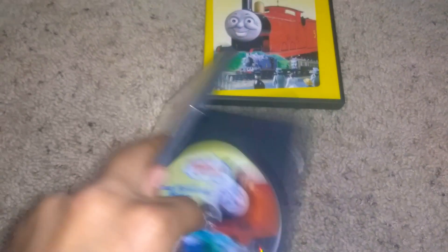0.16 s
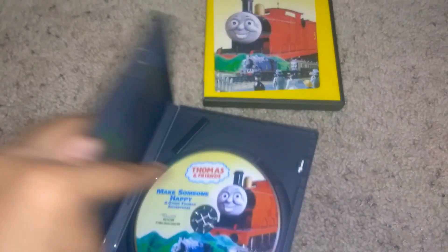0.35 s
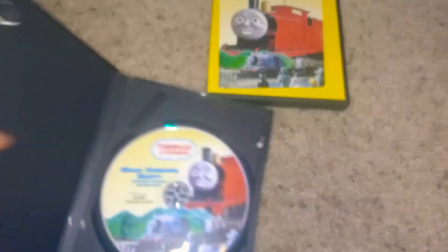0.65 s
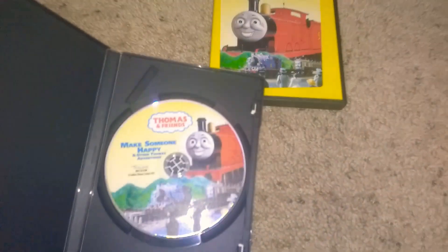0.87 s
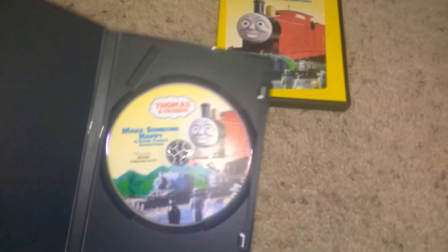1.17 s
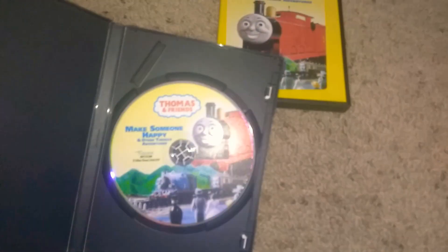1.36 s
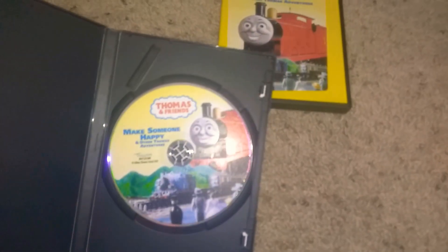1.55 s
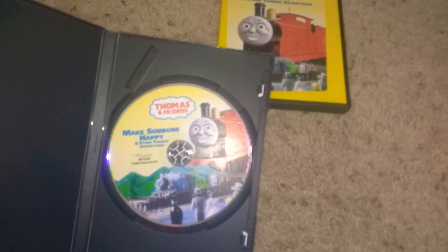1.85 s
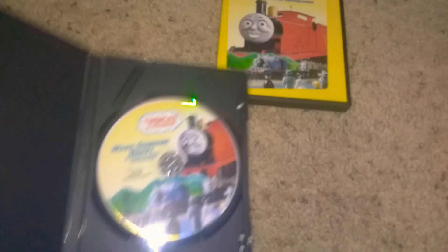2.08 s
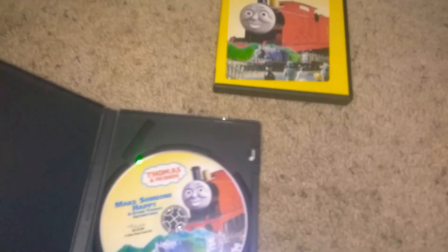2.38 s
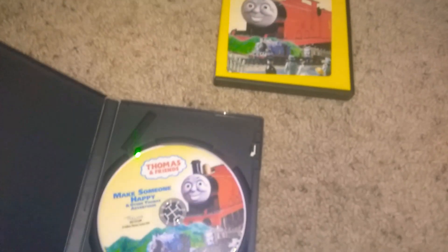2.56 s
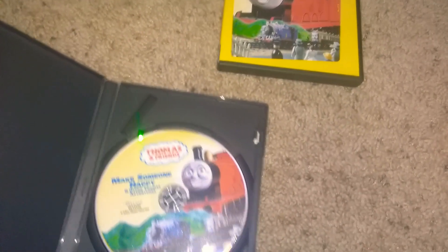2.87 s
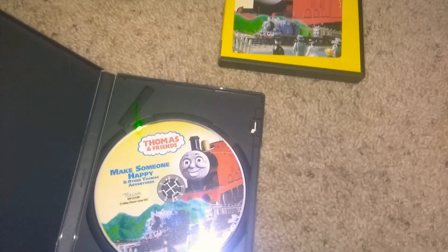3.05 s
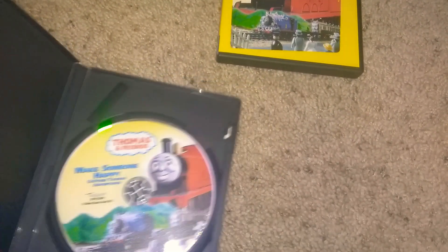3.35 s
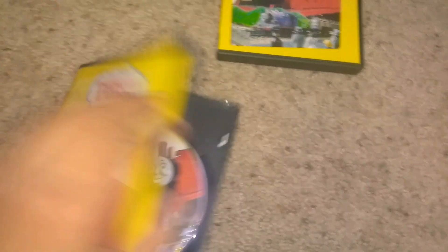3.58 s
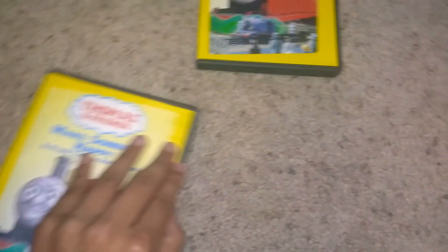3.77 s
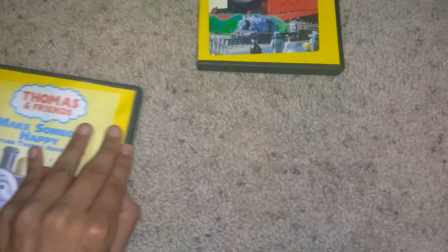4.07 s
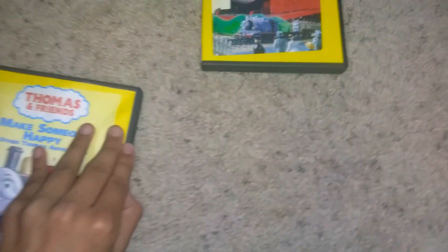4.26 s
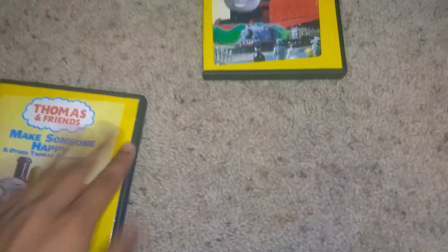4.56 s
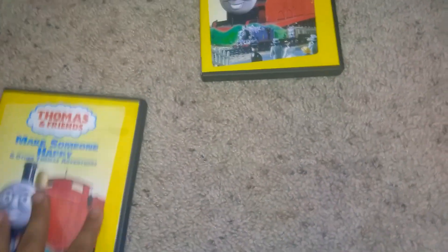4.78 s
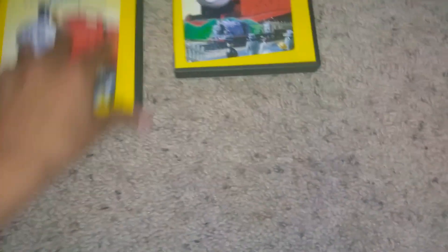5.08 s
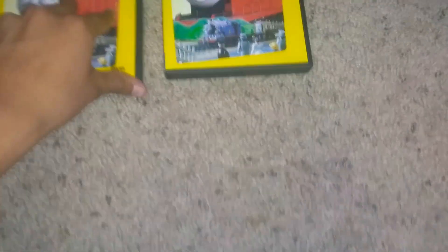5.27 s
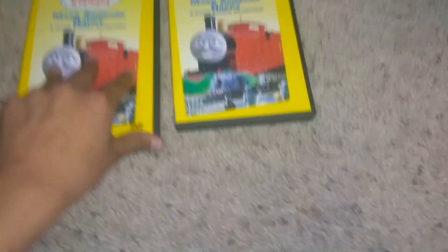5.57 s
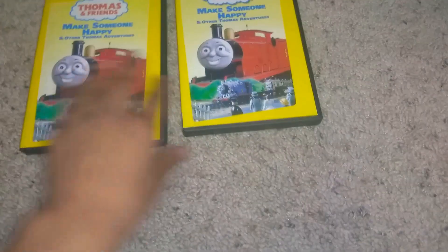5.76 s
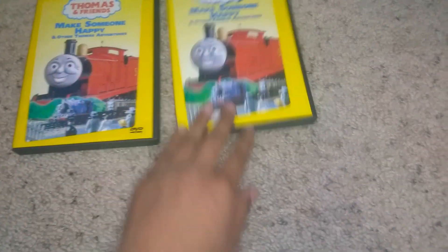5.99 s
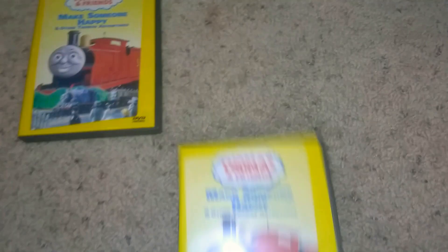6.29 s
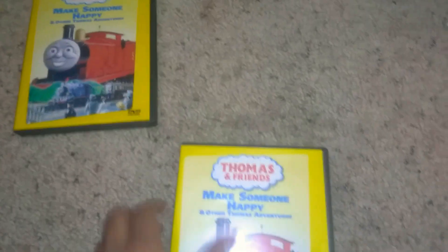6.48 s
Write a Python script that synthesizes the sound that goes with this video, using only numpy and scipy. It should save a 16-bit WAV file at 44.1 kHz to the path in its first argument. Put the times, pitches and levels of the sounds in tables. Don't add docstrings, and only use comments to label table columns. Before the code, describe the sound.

Very close on carpet, a hollow plastic case unlatches with a bright snap and short rattle. After a quiet hissy pause it snaps again more softly, with creaking walls, a thin hinge squeak and bumpy handling rumble. Two strong closing snaps come around four seconds, then light ticks, sleeve film rustle, finger knocks and sliding over the pile. Dry small room, phone microphone, slightly uneven level.

```python
import sys
import numpy as np
from scipy import signal
from scipy.fft import rfft, irfft
from scipy.io import wavfile
from scipy.ndimage import uniform_filter1d

SR = 44100
rng = np.random.default_rng(int(sys.argv[2]) if len(sys.argv) > 2 else 0)


def linear_from_db(decibels):
    return 10 ** (np.asarray(decibels, float) / 20)


def unload_audio(sound):
    columns = np.transpose(np.atleast_2d(sound))
    steps = np.round(np.clip(columns, -1, 1) * 32767)
    wavfile.write(sys.argv[1], SR, steps.astype(np.int16))


N = 292383
T = np.arange(N) / SR


def table(rows, at, log=False):
    x, *columns = np.transpose(rows)
    if log:
        x, at = np.log(x), np.log(at + 1e-9)
    return [np.interp(at, x, c) for c in columns]


def ring(x, hz, width_hz):
    return signal.lfilter(*signal.iirpeak(hz, hz / width_hz, fs=SR), x)


def dull(x, hz):
    keep = np.exp(-2 * np.pi * hz / SR)
    return signal.lfilter([1 - keep], [1, -keep], x)


def unit(x):
    return x / np.abs(x).max()


def colour(x, points):
    gain_db = table(points, np.fft.rfftfreq(N, 1 / SR), log=True)[0]
    return irfft(rfft(x) * linear_from_db(gain_db), N)


def noise(points, grain_db=0.0):
    grain = linear_from_db(grain_db * rng.exponential(size=N))
    x = colour(rng.standard_normal(N) * grain, points)
    return x / x.std()


def flicker(rate_hz, depth_db):
    k = int(SR / rate_hz)
    held = np.repeat(rng.standard_normal(N // k + 1), k)[:N]
    return linear_from_db(depth_db * uniform_filter1d(uniform_filter1d(held, k), k))


def steady(x, span_s):
    return x / np.sqrt(uniform_filter1d(x ** 2, int(span_s * SR)) + 1e-3)


def late(x, samples):
    return irfft(rfft(x) * np.exp(-2j * np.pi * np.fft.rfftfreq(N) * samples), N)


def clicks(events, slips_per_s, lead_db, rise, crack_share, shell_width_hz, thud_db, spray_db,
           preload=0.0, scatter_db=4):
    # f/Hz, width/Hz, level/dB
    shell_modes = [(205, 13, -36.5), (430, 45, -25), (1150, 130, -16.5), (1755, 370, -12.5),
                   (2950, 32, -21), (3470, 100, -60)]
    size, wait = 16384, 32
    out = np.zeros(N + size)
    t = np.arange(size) / SR
    for s, crack_db, shell_db, shell_hz, crack_hz, t60_s in events:
        t60_s = np.clip(t60_s, 0.004, 0.5)
        when, sign, big = rng.random(size), rng.standard_normal(size), rng.exponential(size=size)
        slips = (when < slips_per_s / SR) * np.sign(sign) * linear_from_db(np.minimum(scatter_db * big, 11))
        slips *= linear_from_db(-60 * t / t60_s) * np.minimum(t / (rise * t60_s), 1)
        slips = np.roll(slips, wait)
        spray = linear_from_db(spray_db) * ring(slips, 6000, 6900)
        slips[wait] = linear_from_db(lead_db)
        width_hz = crack_share * crack_hz
        crack = ring(ring(slips, crack_hz, width_hz), crack_hz, width_hz) + spray
        push = dull(slips, 3500)
        thud = linear_from_db(thud_db) * ring(push, 250, 300)
        push[:wait] -= preload * linear_from_db(lead_db) * np.hanning(wait) / wait
        shell = ring(push, shell_hz, shell_width_hz) + thud
        detune = 1 + 0.01 * rng.standard_normal(len(shell_modes))
        for (hz, mode_width_hz, db), d in zip(shell_modes, detune):
            shell += linear_from_db(db) * ring(push, hz * d, mode_width_hz)
        crack = unit(dull(dull(crack, 8800), 8800))
        i = int(s * SR) - wait
        out[i:i + size] += linear_from_db(crack_db) * (crack + linear_from_db(shell_db) * unit(shell))
    return out[:N]


def latches():
    # t/s, crack peak/dB, shell re crack/dB, shell f/Hz, crack f/Hz
    tab_snaps = [(0.155, -18, -10.5, 480, 3220), (.155, -11.5, -3.5, 660, 5680),
                 (.1575, -20.5, -4, 850, 3440), (0.1602, -30, -2, 900, 2900), (0.6451, -41, 6.5, 700, 3700),
                 (2.0906, -21, -1.5, 1280, 4000), (2.0928, -24.5, 3, 646, 2320),
                 (3.9686, -15, 11, 746, 5500), (3.9707, -24.5, -6.5, 780, 3250),
                 (4.2798, -14.5, -1.5, 740, 6060), (4.2813, -23, 7, 740, 3000), (5.98, -40, -5, 800, 4600)]
    # t/s, crack/dB, thud re crack/dB
    lid_landings = [
        (0.649, -52.5, 13.5),
        (2.095, -26.5, 0.5),
        (3.975, -39.5, 3.5),
        (4.286, -38, 10.5),
    ]
    crackle_cycles = 64
    land_hz, land_crack_hz, land_t60_s = 250, 7300, 0.032
    tabs = [(s, db, shell_db, shell_hz, hz, crackle_cycles / hz) for s, db, shell_db, shell_hz, hz in tab_snaps]
    lands = [(s, db, thud_db, land_hz, land_crack_hz, land_t60_s) for s, db, thud_db in lid_landings]
    return clicks(tabs + lands, 7000, 11.43, 0.0057, 0.48, 260, -12.5, -14, preload=0.65)


def creaks():
    # t/s, crack/dB, shell re crack/dB, shell f/Hz, t60/s
    wall_creaks = [(0.281, -63, 7, 350, 0.036), (0.3078, -60.5, -18.5, 832, 0.079),
                   (0.4788, -60.5, 1, 770, .046), (0.5583, -64, 5.5, 353, .04),
                   (2.2055, -39, 3, 1005, 0.057), (2.249, -58.5, 9.5, 776, .064),
                   (2.3025, -41.5, -16, 668, 0.017), (2.364, -51, -9, 619, 0.055),
                   (2.987, -36, 2, 980, 0.046), (3.056, -39.5, -2, 1050, 0.022),
                   (3.067, -39.5, -1.5, 865, 0.063), (3.0996, -52.5, -5, 1040, 0.045),
                   (3.555, -42.5, -17, 640, 0.026), (3.7467, -37.5, 4.5, 1230, 0.031),
                   (3.7697, -55.5, 4, 1080, 0.04), (5.976, -44, 0.5, 740, 0.11)]
    # t/s, crack/dB, shell re crack/dB, crack f/Hz, t60/s
    edge_ticks = [(2.038, -57, -16, 6000, .02), (2.2815, -41, -14, 4000, 0.017),
                  (2.6642, -56, 3.5, 5520, 0.037), (2.7387, -44, -7, 5170, 0.046),
                  (2.9931, -34.5, 4.5, 5940, 0.077), (3.5474, -49.5, -6, 5600, .033),
                  (3.7261, -35, -11, 6260, 0.011), (3.7334, -36.5, -3, 5700, 0.029),
                  (3.9144, -58.5, 4, 5280, 0.36), (4.5873, -44, -4.5, 7500, .026),
                  (4.595, -38, -10, 7480, .03), (5.6848, -46.5, -8, 7600, 0.02),
                  (5.7029, -51, -7, 7850, 0.04), (5.728, -48.5, -6, 7100, 0.032),
                  (6.0573, -40, 0.5, 7300, 0.024), (6.091, -44.5, -3, 5960, .025),
                  (6.2101, -34.5, -32, 7740, 0.059), (6.465, -55.5, -4, 4900, 0.032)]
    # t/s, shell/dB, shell f/Hz, t60/s
    finger_knocks = [(1.0244, -55, 695, .04), (2.2686, -36.5, 634, .037), (2.4104, -36, 720, 0.019),
                     (2.438, -41, 590, 0.076), (2.8906, -50.5, 353, 0.056), (2.9415, -45.5, 1000, 0.02),
                     (3.0583, -32.5, 950, .036), (3.589, -39, 414, 0.027), (3.735, -33.5, 1180, 0.04),
                     (3.809, -43, 826, .02), (3.961, -40.5, 600, 0.02), (4.5575, -53, 641, .05),
                     (4.7878, -38, 696, 0.049), (4.862, -59.5, 400, .02), (4.99, -39.5, 430, 0.013),
                     (5.4446, -58, 720, .036), (6.059, -36, 520, 0.036), (6.092, -42.5, 560, 0.031),
                     (6.2212, -29, 694, 0.036), (6.4997, -43, 740, 0.073), (6.5858, -49, 619, 0.033)]
    wall_hz, tick_shell_hz, knock_crack_db = 2900, 630, -19.5
    walls = [(s, db, shell_db, hz, wall_hz, t60_s) for s, db, shell_db, hz, t60_s in wall_creaks]
    ticks = [(s, db, shell_db, tick_shell_hz, hz, t60_s) for s, db, shell_db, hz, t60_s in edge_ticks]
    knocks = [(s, db + knock_crack_db, -knock_crack_db, hz, wall_hz, t60_s) for s, db, hz, t60_s in finger_knocks]
    out = clicks(walls, 5000, 2.2, 0.014, 0.66, 190, -8.0, -5.5)
    out += clicks(ticks, 5000, 2.4, 0.005, 0.49, 300, -13.5, -6)
    return out + clicks(knocks, 4000, 10.2, 0.057, 0.7, 200, -0.5, -12)


def scrapes():
    # t/s, crack/dB, shell re crack/dB, shell f/Hz, t60/s
    settling = [(.162, -44, .6, 866, 0.22), (.197, -40.5, 0.5, 1150, 0.06), (0.231, -57, -13, 1020, 0.049),
                (0.489, -62, 0, 900, 0.13), (.652, -50.5, 4, 670, 0.1), (0.689, -67, 18, 825, 0.093),
                (.742, -72, 18.5, 1100, 0.1), (.765, -68.5, 11, 864, .075), (2.1, -44.5, 7.5, 730, 0.2),
                (2.144, -56, 13.5, 1250, 0.23), (2.29, -67, -11, 785, 0.36), (2.44, -66.5, 17.5, 543, 0.24),
                (2.46, -69.5, 24, 300, 0.37), (3.984, -47, -6.5, 906, .13), (4.29, -41.5, -1, 697, 0.14),
                (5.99, -54.5, 7, 736, 0.15)]
    # t/s, level/dB, t60/s
    film_brushes = [
        (2.49, -71, 0.27),
        (4.6, -55, .15),
        (5.736, -59.5, 0.1),
    ]
    scrape_hz, film_hz, film_shell_hz, film_shell_db = 2500, 7440, 630, -11
    shell = [(s, db, shell_db, hz, scrape_hz, t60_s) for s, db, shell_db, hz, t60_s in settling]
    film = [(s, db, film_shell_db, film_shell_hz, film_hz, t60_s) for s, db, t60_s in film_brushes]
    return clicks(shell + film, 3000, -19.0, 0.11, 0.91, 400, -2.5, -13)


def squeaks():
    # start/s, end/s, start f/Hz, end f/Hz, level/dB
    hinge = [(1.286, 1.334, 503, 495, -67.5), (1.448, 1.524, 555, 544, -59.5),
             (1.78, 1.904, 547, 588, -65.5), (2.242, 2.272, 2900, 3000, -53),
             (2.289, 2.319, 2960, 2950, -51.5), (2.345, 2.438, 3000, 3040, -65),
             (2.742, 2.877, 2114, 2160, -48.5), (2.748, 2.853, 4130, 3970, -62),
             (2.847, 2.9, 2200, 2160, -66), (4.694, 4.782, 3510, 3850, -73),
             (4.8, 4.916, 3480, 3350, -74.5)]
    # start/s, end/s, f/Hz, level/dB
    rubs = [
        (1.465, 1.63, 1380, -71),
        (2.467, 2.555, 6820, -67),
        (2.735, 2.826, 3250, -61),
    ]
    squeak_width, rub_width = 0.033, 0.21
    rows = [(*row, squeak_width) for row in hinge]
    rows += [(start, end, hz, hz, db, rub_width) for start, end, hz, db in rubs]
    out = np.zeros(N)
    for start, end, from_hz, to_hz, db, share in rows:
        width_hz = share * from_hz
        white = rng.standard_normal(N) + 1j * rng.standard_normal(N)
        wander = dull(dull(white, width_hz), width_hz)
        pitch_hz = np.interp(T, [start, end], [from_hz, to_hz])
        tone = (wander * np.exp(2j * np.pi * np.cumsum(pitch_hz) / SR)).real
        fade = np.clip(np.minimum(T - start, end - T) / 0.014, 0, 1)
        out += linear_from_db(db) * fade * tone / tone.std()
    return out


def pile_drag(motion_db):
    # f/Hz, density/(dB per Hz)
    drag_spectrum = [(100, -45.5), (200, 1), (400, 2), (750, -3), (1200, -12.5), (2000, -24), (4000, -39),
                     (8000, -62)]
    return linear_from_db(-62 + motion_db) * flicker(28, 4) * noise(drag_spectrum, grain_db=0.5)


def film_rustle(motion_db, ride_db):
    # f/Hz, density/(dB per Hz)
    rustle_spectrum = [(500, -50), (1200, -31), (2500, 8.5), (3800, 4.5), (5000, 4.5), (8000, -1),
                       (13000, -11)]
    level_db = -69 + 0.51 * motion_db + 0.1 * ride_db
    return linear_from_db(level_db) * flicker(35, 4) * noise(rustle_spectrum, grain_db=0.5)


def hand_rumble(ride_db):
    # f/Hz, density/(dB per Hz)
    rumble_spectrum = [(20, -20.5), (50, -1.5), (100, 6), (150, 7), (220, -8), (400, -35), (900, -72)]
    # t/s, peak/dB, fade/(dB/s); a negative fade keeps growing from that level
    jolts = [(.16, -53, 124), (1.18, -74, 30), (1.73, -64, 80), (2.1, -59, 302), (2.42, -59, 100),
             (2.466, -37, 123), (2.5, -40, 65), (2.79, -52, 92), (3.01, -57, 52), (3.42, -55, 117),
             (3.62, -59, 81), (3.747, -45.5, 199), (3.97, -48.5, 332), (4.3, -58.5, 60), (4.82, -60, 56),
             (4.99, -64.5, 40), (5.341, -56.5, 50), (5.6, -60, 28.5), (5.98, -52.5, 172),
             (6.389, -59, -7.5)]
    rise_db_s = 700.5
    level = linear_from_db(-58.5 + 0.98 * ride_db)
    for s, db, fade_db_s in jolts:
        level = level + linear_from_db(db - np.maximum(rise_db_s * (s - T), fade_db_s * (T - s)))
    grip = steady(noise(rumble_spectrum), 0.15)
    far = 0.21 * grip + 0.22 * noise(rumble_spectrum)
    return level * flicker(23, 1.4) * np.array([grip, far])


def room(x):
    t60_s, level_db, dull_hz = 0.13, -28, 4000
    t = np.arange(int(0.4 * SR)) / SR
    onset = np.clip(t / 0.0019, 0, 1)
    white = rng.standard_normal((2, len(t)))
    tail = dull(white, dull_hz) * linear_from_db(-60 * t / t60_s)
    tail += linear_from_db(-24.5) * white * linear_from_db(-60 * t / (0.18 * t60_s))
    tail *= onset / np.sqrt(np.sum(tail ** 2, axis=1, keepdims=True))
    return linear_from_db(level_db) * signal.fftconvolve(x[None], tail, axes=1)[:, :N]


def port_hiss(ride_db):
    # f/Hz, density/(dB per Hz)
    hiss_spectrum = [(30, -0.5), (130, 30.5), (300, 36.5), (600, 25.5), (1200, 24), (3000, 17.5),
                     (7000, 11), (14000, 3.5)]
    return linear_from_db(-62.5 + ride_db) * np.array([noise(hiss_spectrum), linear_from_db(-1.5) * noise(hiss_spectrum)])


def scene():
    # t/s, gain/dB
    gain_ride = [(0, -3), (.12, -2.5), (.3, -10.5), (.5, -11), (2.2, 1), (2.97, 1.4), (3.27, -1.5),
                 (3.88, 3), (4.02, -6), (4.52, -5.5), (5.08, 1.1), (6.0, -2.5), (6.13, 5.5), (6.63, -2)]
    # t/s, level/dB
    case_motion = [(.1, -9), (.28, -29), (.48, -11.5), (1.03, -17.5), (1.6, -10.5), (2.1, -7), (2.3, 7.5),
                   (2.77, -24), (2.94, 10.5), (3.1, -10.5), (3.55, -1.5), (3.9, 7.5), (4.06, -14.5),
                   (4.5, -16), (4.9, 0), (5.74, -11), (6.15, 2), (6.63, 0.5)]
    ride_db, motion_db = table(gain_ride, T)[0], table(case_motion, T)[0]
    case = linear_from_db(2.0) * latches() + linear_from_db(4.5) * (creaks() + scrapes())
    case += pile_drag(motion_db) + film_rustle(motion_db, ride_db)
    far = linear_from_db(-6.0) * late(dull(case, 900), 0.5)
    squeak = squeaks() * np.array([[1], [-0.08]])
    return np.array([case, far]) + squeak + room(case) + hand_rumble(ride_db) + port_hiss(ride_db)


def band_limit(x):
    return signal.sosfilt(signal.butter(12, 15960, fs=SR, output="sos"), x)


def record(dry):
    # f/Hz, level/dB
    cancel = [(30, -6.5), (250, -7), (700, -2.5), (2100, -3), (4300, -6.5), (6500, -8.5), (9000, -15.5),
              (13000, -22.5)]
    port_lag_samples, top_hz = 20.66, 14400
    gap_s, gap_width_s, gap_db = 0.3425, 0.005, 15
    crossed = [colour(late(port, port_lag_samples), cancel) for port in dry[::-1]]
    top_cut = signal.ellip(6, 0.3, 35, top_hz, fs=SR, output="sos")
    sides = signal.sosfilt(top_cut, dry - crossed)
    sides = sides * linear_from_db(-gap_db * np.exp(-((T - gap_s) / gap_width_s) ** 6))
    return band_limit(np.clip(sides, -1, 1))


dry = scene()
out = record(dry)
unload_audio(out)
```